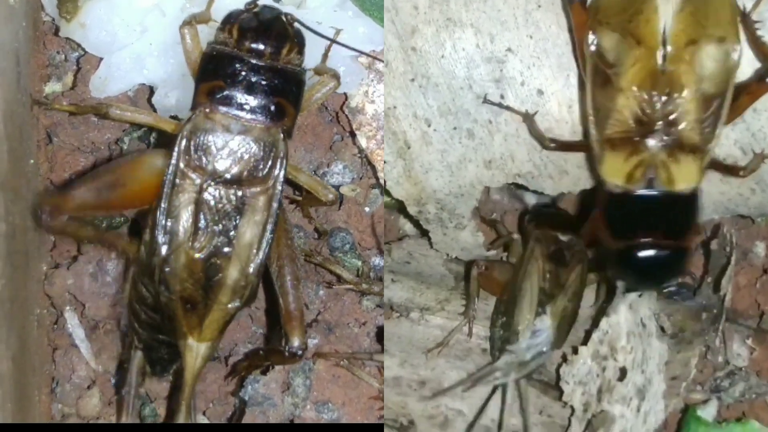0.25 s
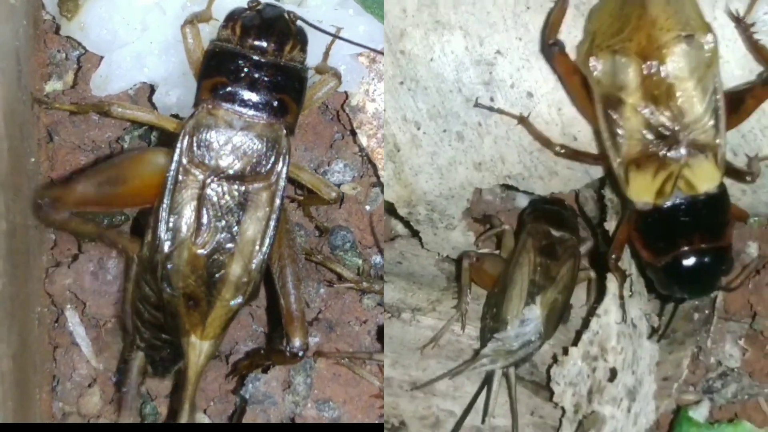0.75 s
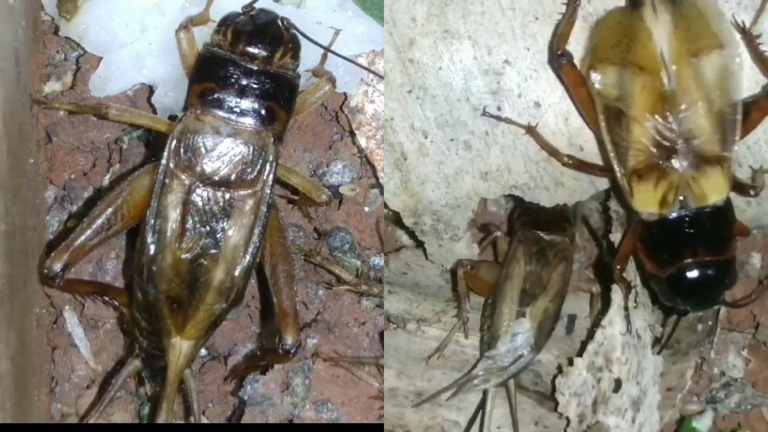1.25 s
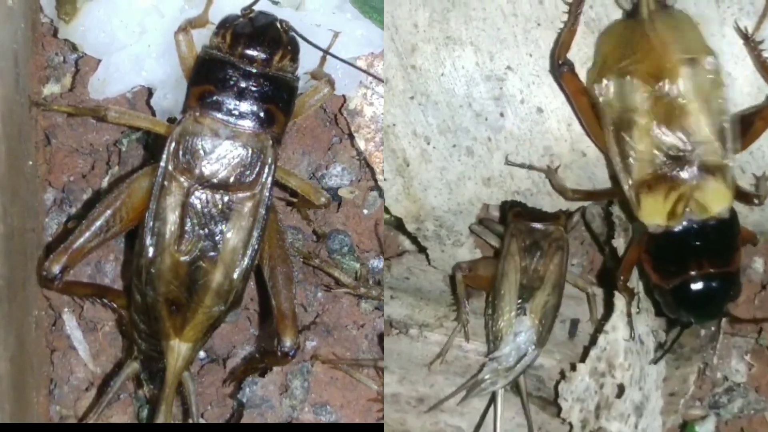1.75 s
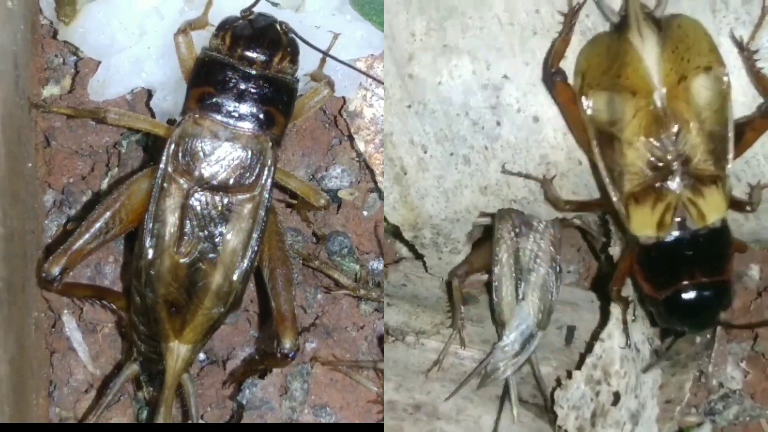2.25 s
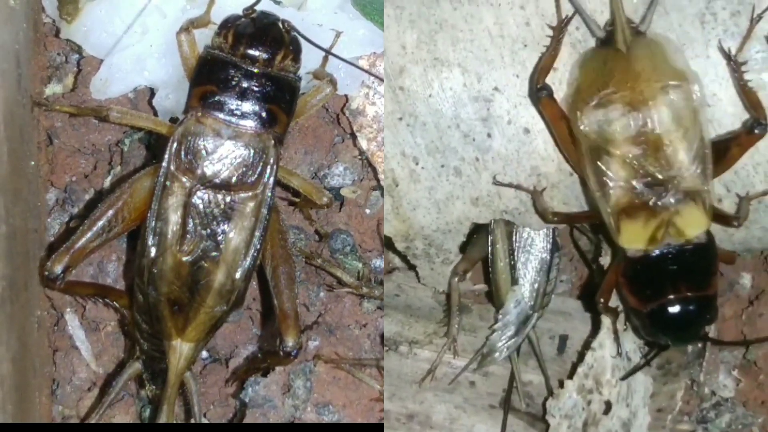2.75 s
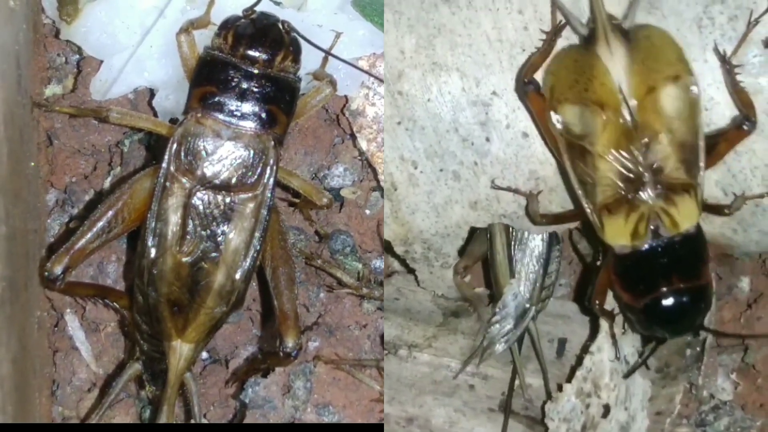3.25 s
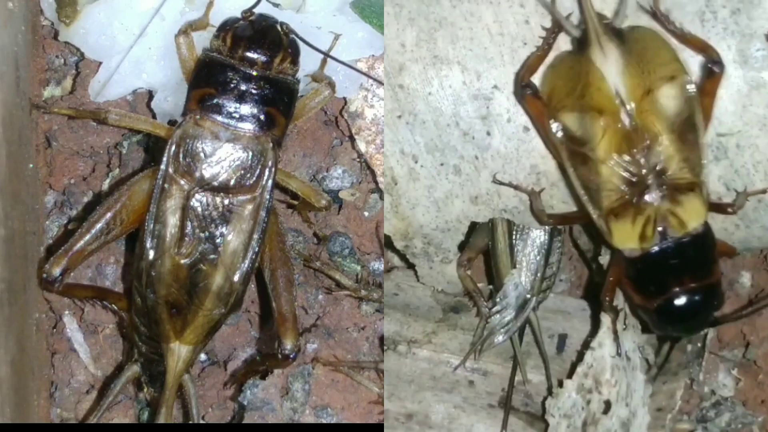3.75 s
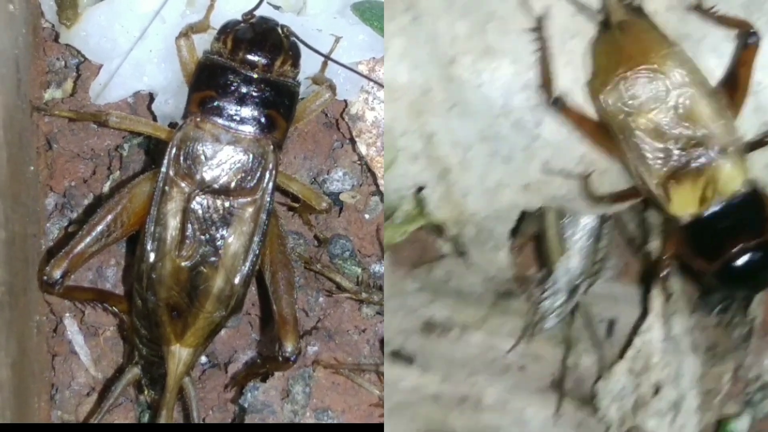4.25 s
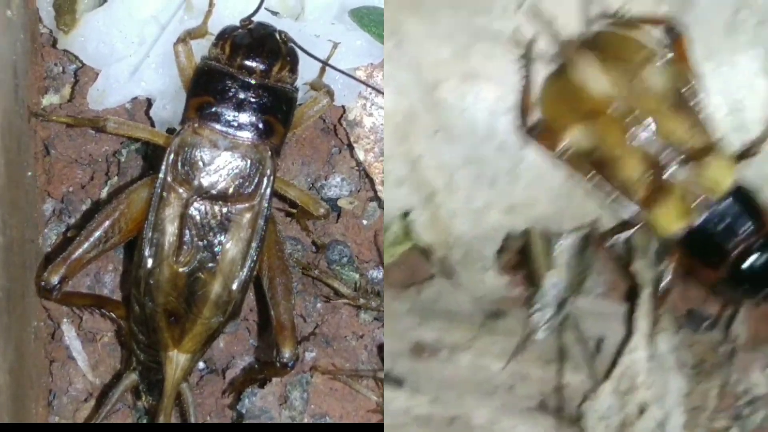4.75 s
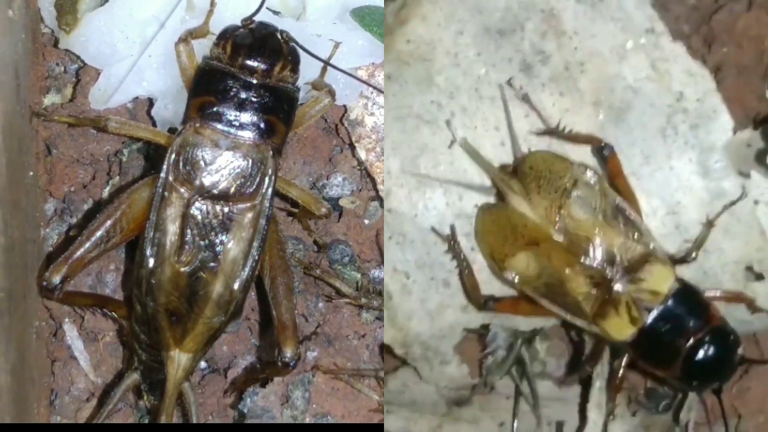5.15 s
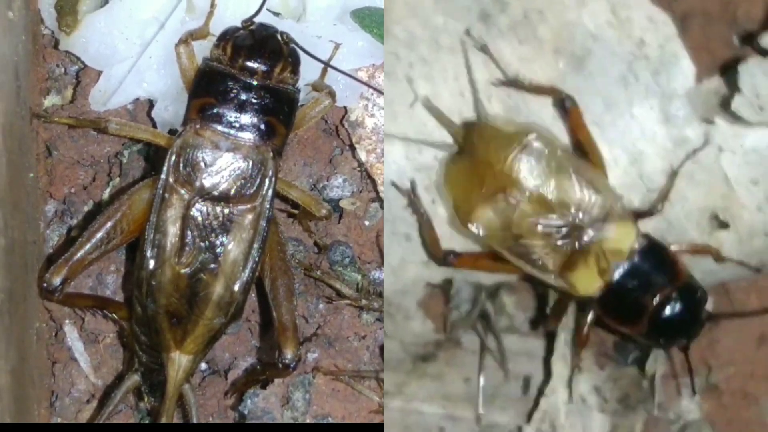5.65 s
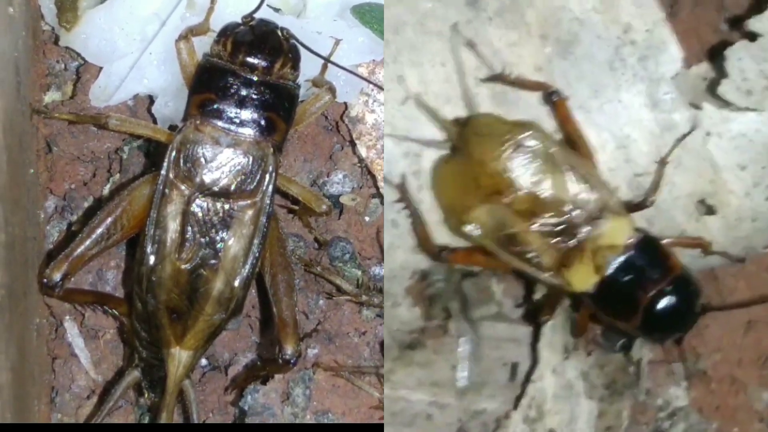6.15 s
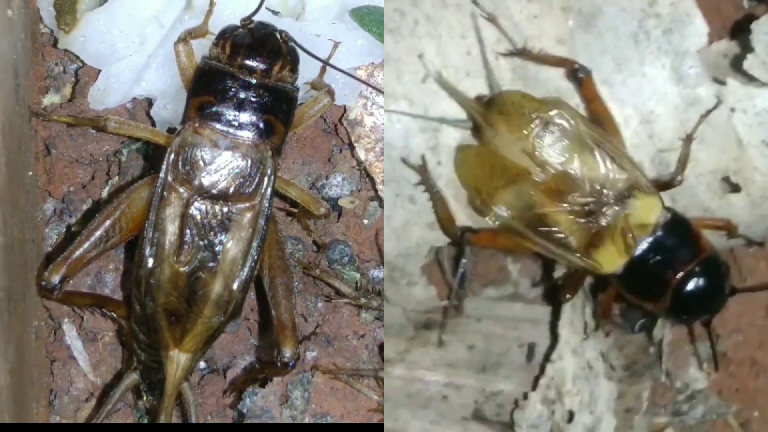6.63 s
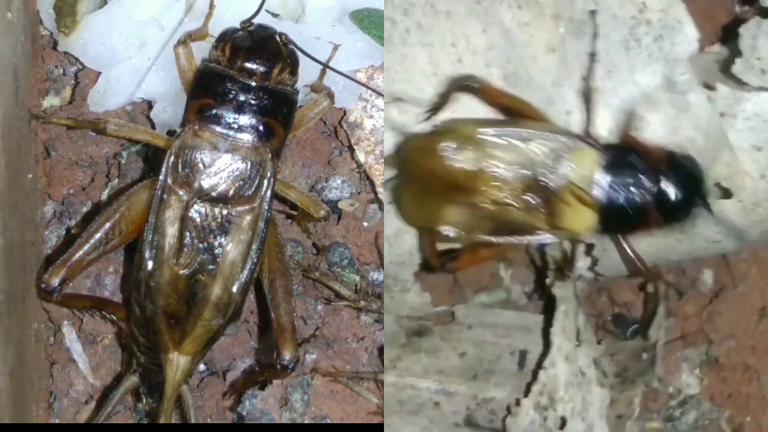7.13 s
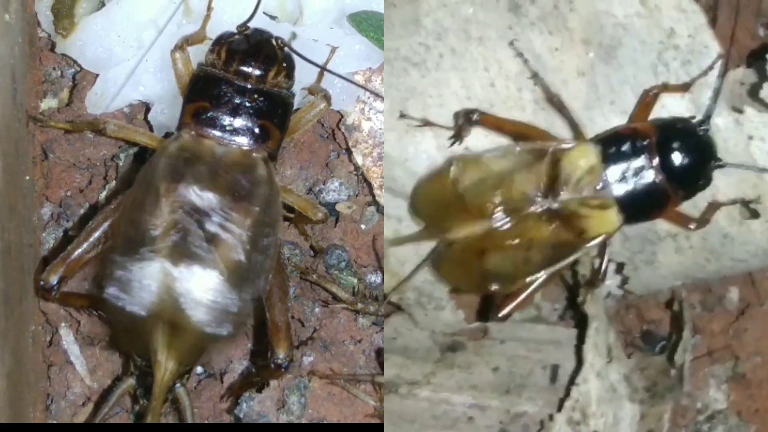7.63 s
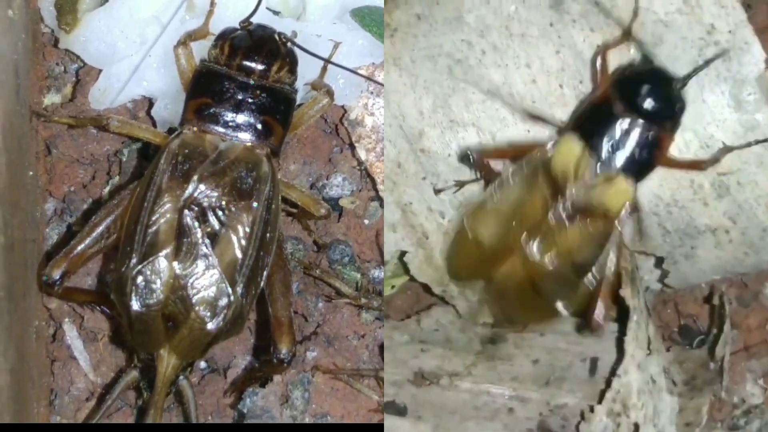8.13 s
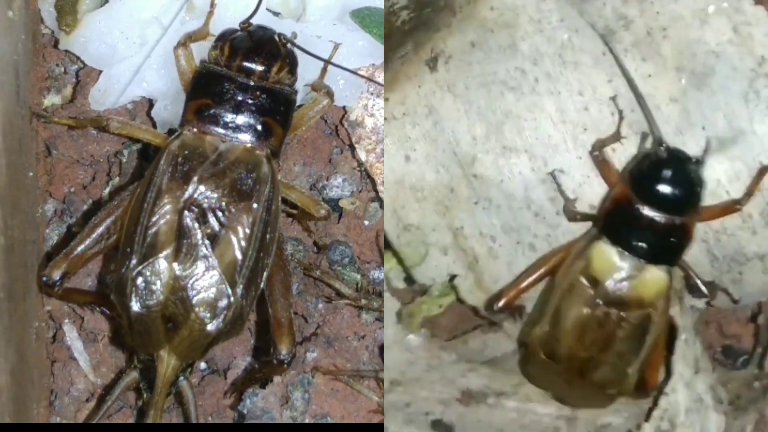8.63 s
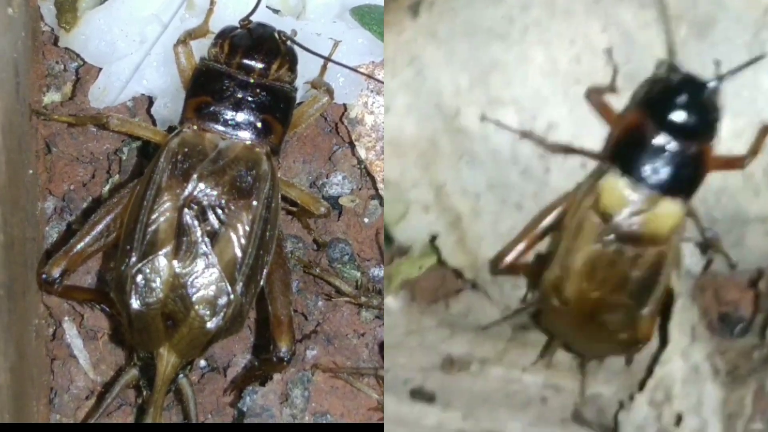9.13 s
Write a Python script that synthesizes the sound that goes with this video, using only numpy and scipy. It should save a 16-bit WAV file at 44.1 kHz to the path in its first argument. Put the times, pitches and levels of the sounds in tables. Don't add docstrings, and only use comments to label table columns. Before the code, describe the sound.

Soft scratchy flicks and very high ticks, stronger on the right, begin about five times a second. Ringing two-part chirps break in briefly, ticks return, then chirps take over at a brisk regular pace. Gentler strokes answer late, leaves rustle faintly, and ticks mix with the last chirps. Close stereo microphone, quiet low hum, short room reverberation.

```python
import sys
import numpy as np
from scipy import signal
from scipy.fft import rfft, irfft, next_fast_len
from scipy.io import wavfile
from scipy.ndimage import uniform_filter1d, minimum_filter1d

SR = 44100
rng = np.random.default_rng(int(sys.argv[2]) if len(sys.argv) > 2 else 0)


def amplitude_ratio(level_db):
    exponent = np.asarray(level_db, float) / 20
    return 10 ** exponent


def generate_wav(signal):
    frames = np.transpose(np.atleast_2d(signal))
    scaled = np.clip(frames, -1, 1) * 32767
    pcm = np.round(scaled).astype(np.int16)
    wavfile.write(sys.argv[1], SR, pcm)


N = 413658

# frequency_hz, density_db
AIR_SPECTRUM = [(22, -53), (45, -1.5), (75, -2.5), (130, -5.5), (220, -13.5), (400, -23), (600, -28),
                (1000, -24.5), (1600, -29.5), (2200, -29.5), (4000, -35.5), (6000, -54.5), (9000, -52),
                (16000, -38)]
AIR_DB = -40
# frequency_hz, likeness_ratio
AIR_COHERENCE = [(60, 0.9), (240, 0.68), (950, 0.0081), (3770, 0.02), (15000, 0.03)]
# frequency_hz, width_hz, level_db
HUM_PARTIALS = [(47.6, 9, -51), (100.5, 9.4, -50), (145, 44, -55), (198, 12.1, -55)]
# start_s, length_s, pitch_hz, level_db
GROANS = [
    (0.024, 0.16, 270, -53.5),
    (3.356, 0.13, 270, -50),
    (6.136, 0.092, 476, -48.5),
    (6.25, .12, 463, -59.5),
]
# time_s, level_db
LEAF_RUSTLE = [
    (8.22, -59),
    (8.3, -51.5),
    (8.39, -47),
    (8.56, -56),
]
# frequency_hz, level_db
LEAF_COLOUR = [(600, -14), (1200, -2), (3000, 0), (6000, -6), (14000, -12)]

# start_s, peak_db, pitch_hz, push_db
TAPS = [
    (.98, -30.5, 940, -42),
    (4.422, -10.5, 1310, -24),
    (6.745, -21.5, 920, -39),
    (6.7673, -9.5, 1350, -23),
]

# frequency_hz, decay_t60_s
ROOM_DECAY = [(5000, 0.43), (12000, 0.36), (15500, 0.24)]
# delay_ms, left_gain_ratio, right_gain_ratio
WALL_ECHOES = [(3.1, .05, .15), (18, .06, .02)]
# frequency_hz, left_db, right_db
WALL_COLOUR = [(4300, -9.5, -12), (5930, -15.5, -25.5), (8130, -16.5, -14.5), (11800, -25, -15),
               (13400, -25.5, -20), (14800, -19, -17.5)]
# frequency_hz, level_db
CAPSULE = [(1, 1), (7000, -1), (8000, -2.5), (8700, 0), (9500, 4), (15300, -4.5), (15700, -12),
           (16100, -13), (17000, -34), (22000, -71)]
# frequency_hz, shift_db
MASK_TILT = [(3000, -4), (3900, 0), (4500, -4), (7000, -2), (8000, 7), (8700, 5), (9400, -5), (13500, -3),
             (16000, 14)]
MASK_DB, MASK_TOP_DB, MASK_FROM_HZ = 24, -76, 3000

# frequency_hz, width_hz, level_db
WING_MODES = [(5190, 650, 8.4), (6410, 1100, 5.5), (7480, 660, -9)]
# frequency_hz, level_db
RASP_COLOUR = [(7500, 9.5), (9000, -1), (10500, -4.5), (12000, 11), (13500, -2), (15000, 6.5), (16000, -41)]
# start_s, peak_db, pitch_hz
FLICKS = [(0.0762, -47, 5500), (0.0916, -41, 5030), (0.1356, -34.5, 6460), (0.2104, -46.5, 5120),
          (0.2254, -40, 6700), (0.2972, -42, 5330), (0.3726, -39, 6600), (0.388, -40.5, 4900),
          (0.4145, -35.5, 6330), (0.4429, -40, 4830), (0.5487, -42, 5250), (0.596, -38.5, 5470),
          (0.6744, -43, 4930), (0.6963, -40, 4960), (0.762, -41, 5220), (1.201, -55, 5250),
          (1.244, -41, 5060), (1.3044, -45.5, 5630), (1.9589, -39, 5600), (1.987, -42, 5330),
          (2.1445, -46, 6700), (2.158, -38.5, 5870), (2.2348, -40, 5400), (2.3695, -41, 5900),
          (2.4339, -44.5, 4850), (2.4464, -42, 5580), (2.5237, -42, 5300), (3.2084, -35.5, 6300),
          (3.2829, -40, 5340), (3.3772, -38.5, 5460), (3.401, -31.5, 5730), (3.4775, -45, 5310),
          (3.4994, -38.5, 5430), (3.581, -44, 5940), (3.6651, -43, 5230), (3.721, -44.5, 5330),
          (3.7499, -48, 5690), (3.7643, -37, 5540), (3.8074, -41, 5760), (3.917, -39.5, 5900),
          (3.9684, -30.5, 6520), (4.047, -38.5, 5380), (4.1076, -37.5, 5800), (4.2393, -42, 5350),
          (4.3101, -39, 5900), (4.3542, -34, 5980), (4.4747, -40.5, 5470), (4.5037, -38, 6700),
          (4.5251, -39.5, 6530), (4.572, -34.5, 5670), (4.6219, -49, 5490), (4.6394, -35.5, 5360),
          (4.718, -39.5, 6440), (4.7461, -37, 5840), (4.7824, -41.5, 5820), (4.8349, -49, 5520),
          (4.921, -35, 5960), (7.477, -46, 4940), (7.4904, -47, 5370), (7.556, -40, 5360)]
FLICK_MS, FLICK_LEFT_DB, FLICK_RIGHT_DB, FLICK_RASP_DB = 3.03, -2, -11, -17
# start_s, pitch_hz, right_db, left_db, wing_ring_left_db
TICKS = [(0.05, 14560, -19.5, -33, -40), (0.268, 15360, -7.5, -22, -33.5), (0.5, 15000, -11.5, -25, -36.5),
         (0.7304, 14830, -11.5, -25, -35), (1.8547, 14600, -12.5, -26, -37),
         (2.0466, 12540, -11.5, -26, -18), (2.257, 14800, -15, -29, -40), (2.4685, 15150, -15.5, -32, -37),
         (3.0715, 13400, -7, -21, -13), (3.252, 14300, -14, -27, -36), (3.445, 15100, -10, -24, -32),
         (3.6255, 15100, -10, -26, -32.5), (3.826, 15500, -9.5, -35, -37), (4.015, 15050, -11, -22, -36),
         (4.2005, 14400, -15, -26, -32.5), (4.398, 14740, -13, -23, -30), (4.593, 14400, -16.5, -26, -30.5),
         (4.8014, 13760, -14.5, -30, -33.5), (7.206, 15300, -8.5, -24.5, -29.5),
         (7.39, 13870, -15.5, -28, -35.5), (7.587, 14560, -13, -26, -30), (8.578, 13160, -9.5, -23, -26),
         (9.239, 14370, -11.5, -31, -31.5)]
TICK_RASP_DB = -29
# start_s, ring_left_db
COCKS = [(0.015, -35), (0.4553, -39.5), (0.648, -44), (1.1116, -37.5), (1.2585, -37), (2.689, -35.5),
         (3.217, -49), (3.4125, -37.5), (3.588, -40.5), (3.776, -42), (3.982, -39.5), (4.156, -45),
         (4.361, -40), (4.5416, -44), (4.765, -42)]
COCK_MS, COCK_RASP_DB = 14.3, -54.5
# start_s, ring_left_db, rasp_right_db
RETURNS = [(0.1034, -45, -47), (0.337, -44.5, -48.5), (0.558, -45, -59), (1.9217, -43, -54),
           (2.097, -42, -48), (2.3143, -49, -53), (3.3056, -39.5, -55), (3.513, -47, -51.5),
           (3.6763, -56, -51), (3.8836, -45, -48), (4.0642, -45, -47), (4.248, -45, -51), (4.448, -42, -47),
           (4.652, -45, -65), (4.854, -38, -55)]
RETURN_MS = 13.5
# ahead_ms, length_ms, ring and rasp relative to the opening stroke_db
LIFT = (16, 7.5, -46, -40.5)
# start_s, length_ms, ring_left_db, rasp_right_db
STRAYS = [(0.0022, 8.4, -39, -54), (1.1, 16, -41.5, -51), (1.213, 5.2, -42, -53), (1.353, 5.5, -57, -62),
          (1.618, 8.8, -38, -51), (1.6393, 15, -34.5, -48), (2.415, 5.2, -50, -62), (2.669, 12, -40, -50),
          (3.5285, 8.5, -41, -55), (3.6928, 10.3, -39, -56), (4.117, 3.4, -43, -57), (4.268, 8.3, -44, -54),
          (4.908, 4.2, -43, -57), (5.075, 6, -41, -51), (5.262, 10, -40, -55), (8.704, 5.2, -49, -56),
          (4.964, 3.4, -41, -60), (7.382, 3.5, -62, -52), (7.5283, 5.1, -30, -46), (7.652, 4, -51, -52),
          (7.764, 5.3, -44, -41), (7.781, 6, -26, -41), (8.1795, 5.7, -35, -47), (8.282, 4.6, -39, -52),
          (8.3, 5.7, -41.5, -51), (8.35, 4.9, -38, -52), (8.33, 8, -45, -51), (8.368, 9.4, -33.5, -44),
          (8.3915, 5.3, -29.5, -44), (8.407, 4, -33, -40), (8.52, 3.7, -57, -52), (8.5616, 5.7, -45.5, -40),
          (8.871, 6, -39, -47), (9.0323, 7.7, -40, -52), (9.188, 8, -38.5, -52), (9.21, 5, -49, -56),
          (9.33, 8.9, -37, -49)]

# start_s, length_ms, pitch_hz, left_db, rise_ms
SLOW_STROKES = [
    (7.5811, 19.6, 5410, -22, 1.1),
    (7.626, 35, 5730, -19, 14),
    (7.691, 31.6, 5776, -19.5, 7.7),
    (7.748, 27.4, 5530, -21.5, 18),
]
SLOW_RIGHT_DB, SLOW_SECOND_DB, SLOW_RASP_DB = -3.5, -18.5, -44
# pitch_hz, left_db, right_db, second_harmonic_db
SLOW_BEAM = [(5050, -6, -5, -4), (5250, -3, -6, 0), (5450, -1, -8, -3), (5600, 0, -1, -12), (5800, -1, 0, -6)]
# pitch_hz, left_db, right_db, second_harmonic_db
BEAM = [(5250, -30, -18, -16), (5390, -14, -12, -11), (5480, -5, -9, -7), (5610, -.5, -4, -4),
        (5720, -.5, -1, -6), (5830, -6, 0, -1), (5960, -16, -3, 0), (6200, -23, -10, -6)]
# pitch_hz, left_db, right_db, second_harmonic_db
TURNED_BEAM = [(5350, -22, -18, -22), (5480, -6, -12, -11), (5610, 0, -9, -3), (5710, -1, -3, -1),
               (5810, -9, 0, 0), (5900, -22, -1, -2), (6020, -19, -4, -7), (6200, -15, -8, -18)]
TURN_S = 8.1
# start_s, opening_pitch_hz, opening_left_db, closing_gap_ms (5 or less for none), closing_left_db
CHIRPS = [(1.4221, 5850, -15, 26, -5), (1.6681, 5890, -11, 4.5, -2), (2.7125, 6200, -6.5, 0, 0),
          (2.867, 5780, -11.5, 24.5, -4.5), (4.9916, 5890, -11, 24.5, -4.5), (5.1699, 5950, -5.5, 27, -2.5),
          (5.367, 6090, -3.5, 27, -1.5), (5.5676, 6140, -3.5, 28, -1), (5.7614, 6010, -3.5, 26, -1),
          (6.041, 5986, -4, 26, -2), (6.2084, 5890, -5, 23, -2), (6.3959, 6110, -2.5, 27.5, -1.5),
          (6.5917, 6030, -4.5, 24.5, -1), (6.8012, 6130, -3.5, 25.5, -1), (6.9737, 5880, -7, 21.5, -1),
          (7.023, 6130, -3.5, 0, 0), (7.8002, 6140, -7, 24.5, -4), (7.9765, 5900, -5.5, 23.5, -3),
          (8.187, 5860, -6, -3.5, -2), (8.4153, 5930, -8.5, 0, 0), (8.7197, 5720, -2.5, 19.5, -1.5),
          (8.8876, 5870, -4, 23.5, -2), (9.0503, 5950, -8.5, 20.5, -3.5)]
CLOSING_HZ, CLOSING_SECOND_DB = 6220, -3.5
END_HZ, TURNED_END_HZ, SINK_HZ_PER_MS = 5200, 5320, 58
# time_s, right_minus_left_db, second_harmonic_minus_left_db
FACING = [(1.4, -5.5, -8.5), (2.8, -5, -10.5), (5, -9, -15), (5.5, -15.5, -18.5), (7.05, -14, -15.5),
          (7.8, -12, -14.5), (8.0, -9.5, -14.5), (8.19, -7, -10.5), (8.42, -1.5, -10), (8.72, -14, -9),
          (8.9, -8, -9.5), (9.06, -5.5, -8.5)]
# frequency_hz, level_db
CATCH_COLOUR = [(5500, 29.0), (6700, 23.0), (8000, 11), (10000, 8.0), (13500, 14.0), (14600, 12), (16200, -30)]
RIGHT_LEAD, LEFT_SECOND_LEAD = 0.33, 2.1
LEFT_LAG = 17


def evened(x):
    return x / np.sqrt(np.mean(x ** 2) + 1e-20)


def read(points, hz):
    f, value = np.transpose(points)
    return np.interp(np.log(hz + 1), np.log(f + 1), value)


def add(mix, s, sound):
    part = mix[:, round(s * SR):][:, :sound.shape[1]]
    part += sound[:, :part.shape[1]]


def coloured(x, points):
    size = next_fast_len(x.shape[-1])
    hz = np.fft.rfftfreq(size, 1 / SR)
    inside = (hz > points[0][0]) & (hz < points[-1][0])
    return irfft(rfft(x, size) * amplitude_ratio(read(points, hz)) * inside, size)[..., :x.shape[-1]]


def whistle(hz, width):
    r = np.exp(-np.pi * width / SR)
    z = rng.standard_normal(N) + 1j * rng.standard_normal(N)
    slow = signal.lfilter([1], [1, -2 * r, r * r], z)
    return evened((slow * np.exp(2j * np.pi * hz * np.arange(N) / SR)).real)


def wobble(size, ms):
    span = int(ms * SR / 1000) + 1
    return evened(uniform_filter1d(uniform_filter1d(rng.standard_normal(size), span), span))


def gritty(points, grain_db):
    slips = rng.standard_normal(N) * amplitude_ratio(grain_db * wobble(N, 0.29))
    other = rng.standard_normal(N) * amplitude_ratio(grain_db * wobble(N, 0.17))
    return evened(coloured(slips, points)), evened(coloured(other, points))


def background():
    frames, hz, t = N // 256 + 5, np.fft.rfftfreq(1024, 1 / SR), np.arange(N) / SR
    a, b, c, d, patches = rng.standard_normal((frames, 513, 5)).T
    patches = evened(uniform_filter1d(uniform_filter1d(patches, 12, 0), 14, 1))
    same = np.clip(read(AIR_COHERENCE, hz), -1, 1)[:, None]
    left = a + 1j * b
    right = same * left + np.sqrt(1 - same ** 2) * (c + 1j * d)
    z = np.array([left, right]) * amplitude_ratio(1.93 * patches)
    air = signal.istft(z, nperseg=1024, noverlap=768)[1][:, :N]
    out = amplitude_ratio(AIR_DB - 4) * evened(coloured(air, AIR_SPECTRUM))
    hum = sum(amplitude_ratio(db) * whistle(f, width) for f, width, db in HUM_PARTIALS)
    out += hum * amplitude_ratio([[-1.5], [1.5]])
    for s, length, f, db in GROANS:
        out += amplitude_ratio(db) * whistle(f, 67) * np.exp(-((t - s - length / 2) / (length / 2)) ** 4)
    leaves = np.array(gritty(LEAF_COLOUR, 5.0)) * amplitude_ratio(4 * wobble(N, 2) - 1)
    return out + leaves * amplitude_ratio(np.interp(t, *np.transpose(LEAF_RUSTLE)))


def room(x):
    taps = np.zeros((2, SR // 2))
    at = np.arange(200, SR // 2 - 20, 20) + rng.integers(0, 20, (2, (SR // 2 - 201) // 20))
    np.put_along_axis(taps, at, rng.choice([-1., 1.], at.shape), 1)
    hz, t, z = signal.stft(taps, SR, nperseg=256)
    tail = signal.istft(z * amplitude_ratio(-60 * t / read(ROOM_DECAY, hz)[:, None]), SR, nperseg=256)[1]
    tail /= np.linalg.norm(tail[0])
    wet = signal.fftconvolve(x[2:], tail, axes=1)[:, :N]
    f, *sides = np.transpose(WALL_COLOUR)
    out = np.array([coloured(w, [(1, -23)] + list(zip(f, db)) + [(22000, -28)]) for w, db in zip(wet, sides)])
    for ms, left, right in WALL_ECHOES:
        out += np.roll(x[:2], int(ms * SR / 1000), axis=1) * [[left], [right]]
    return out


def taps():
    out, t = np.zeros((2, N)), np.arange(-120, 500) / SR
    for s, db, hz, push_db in TAPS:
        snap = amplitude_ratio(db) * np.exp(-(abs(t) * hz / 0.58) ** 2.7) * np.sin(-2 * np.pi * hz * t)
        later = np.maximum(t - .001, 0)
        push = amplitude_ratio(push_db) * 2.0 * np.sin(2 * np.pi * 170 * later) * np.exp(-later / 0.0025)
        add(out, s + t[0], np.array([snap + push, 0 * t]))
    return out


def wing_ring(wander_db, wander_ms):
    modes = (amplitude_ratio(db + wander_db * wobble(N, wander_ms)) * whistle(hz, width) for hz, width, db in WING_MODES)
    return evened(sum(modes) * amplitude_ratio(1.4 * wobble(N, 0.12)))


def flicks():
    out, rasp = np.zeros((3, N)), np.zeros((1, N))
    t = np.arange(500) / SR * 1000
    shape = t / FLICK_MS * np.exp(1 - t / FLICK_MS) * np.clip((t[-1] - t) / 2, 0, 1)
    for s, db, hz in FLICKS:
        note = np.sin(2 * np.pi * np.cumsum(hz + 330 * wobble(500, 0.18)) / SR)
        note = note * amplitude_ratio(np.minimum(3.15 * wobble(500, 0.33), 4))
        levels_db = db + np.array([[FLICK_LEFT_DB], [FLICK_RIGHT_DB], [-3.0]])
        add(out, s - .0025, amplitude_ratio(levels_db) * shape * note)
        add(rasp, s - .0025, amplitude_ratio(db + FLICK_RASP_DB) * shape[None])
    return out, rasp


def ticks():
    out, rasp = np.zeros((3, N)), np.zeros((1, N))
    t = np.arange(600) / SR * 1000
    shape = (t / 2.84) ** 3 * np.exp(3 - 3 * t / 3.624)
    for s, hz, right_db, left_db, ring_db in TICKS:
        pitch = hz * 1.03 - 70 * (t - 3) + 300 * wobble(600, 0.2)
        stray = hz * .95 + 900 * wobble(600, .2)
        wing = 6400 - 110 * (t - 3) + 190 * wobble(600, 0.3)
        high, side, low = np.sin(2 * np.pi * np.cumsum([pitch, stray, wing], axis=1) / SR)
        side_beats = 2 * np.array([wobble(600, .4), 0 * t, wobble(600, .4)])
        beats = amplitude_ratio(np.clip(5 * wobble(600, .3) + side_beats, -18, 6))
        whistled = high + amplitude_ratio(-8.0) * side
        add(out, s, amplitude_ratio([[left_db], [right_db], [right_db]]) * 0.42 * shape * beats * whistled)
        add(out, s, amplitude_ratio(ring_db + np.array([[-1.5], [-9], [-2.5]])) * shape * np.sqrt(beats) * low)
        add(rasp, s, amplitude_ratio(right_db + TICK_RASP_DB) * shape[None])
    return out, rasp


def scrapes():
    ahead, lift_ms, lift_ring_db, lift_rasp_db = LIFT
    rows = [(s, COCK_MS, db, COCK_RASP_DB) for s, db in COCKS]
    rows += [(s, RETURN_MS, *db) for s, *db in RETURNS]
    rows += [(s - ahead / 1000, lift_ms, db + lift_ring_db, db + lift_rasp_db)
             for s, _, db, gap, _ in CHIRPS if gap > 5 and s < TURN_S]
    return [*rows, *STRAYS]


def wings():
    out, rasp = (a + b for a, b in zip(ticks(), flicks()))
    ring, busy = np.zeros((2, 1, N))
    for s, ms, ring_db, rasp_db in scrapes():
        shape = signal.windows.tukey(int((ms + 2) * SR / 1000), .8)[None]
        add(ring, s - .001, amplitude_ratio(ring_db + 3.5) * shape)
        add(rasp, s - .001, amplitude_ratio(rasp_db + 6.0) * shape)
        add(busy, max(s - .07, 0), np.hanning(6600)[None])
    brush = np.minimum(busy, 1) * amplitude_ratio(-56 + 5.5 * np.minimum(wobble(N, .8), 2.2))
    ring, rasp = ring + brush, rasp + amplitude_ratio(-28.0) * brush
    ring_l, ring_r = wing_ring(2.5, 2.5), wing_ring(2.5, 2.5)
    rasp_l, rasp_r = gritty(RASP_COLOUR, 3)
    out[0] += ring[0] * ring_l + amplitude_ratio(-11.0) * rasp[0] * (0.384 * rasp_r + 2.04 * rasp_l)
    out[1] += amplitude_ratio(-8) * ring[0] * (0.39 * ring_l + 0.8 * ring_r) + rasp[0] * rasp_r
    out[2] += amplitude_ratio(-6.0) * ring[0] * ring_l + amplitude_ratio(1.0) * rasp[0] * rasp_r
    return out


def strokes():
    rows = [(s, hz, db, 0) for s, hz, db, _, _ in CHIRPS]
    rows += [(s + gap / 1000, CLOSING_HZ, db, CLOSING_SECOND_DB) for s, _, _, gap, db in CHIRPS if gap > 5]
    at, right_db, second_db = np.transpose(FACING)
    out = []
    for s, hz, db, purer in rows:
        end_hz = END_HZ if s < TURN_S else TURNED_END_HZ
        ms = (hz - end_hz) / SINK_HZ_PER_MS
        out.append((s, ms, hz, db, db + np.interp(s, at, right_db), db + purer + np.interp(s, at, second_db)))
    return out


def stroke(row, beam, fall_hz_ms, bend, rise_ms, left_second_db=-13, hook_hz=400, flutter_db=1.11,
           second_lead=LEFT_SECOND_LEAD):
    s, ms, hz, left_db, right_db, second_db = row
    t = np.arange(int(ms * SR / 1000)) / SR * 1000
    cycle = np.arange(len(t)) % 600
    glide = fall_hz_ms * t * ((1 - bend) + bend * 2 * (t / ms) ** 2 - bend * .5)
    hook = hook_hz * np.exp(-t / .7)
    pitch = hz - glide + 15 * wobble(600, 0.15)[cycle]
    turn = 2 * np.pi * (np.cumsum(pitch + hook) / SR + rng.random())
    edge = np.clip(t / rise_ms, 0, 1) * np.clip((ms - t) / 3, 0, 1)
    f, *gains = np.transpose(sorted(beam))
    left, right, second = (edge * amplitude_ratio(uniform_filter1d(np.interp(pitch, f, g), size=60)) for g in gains)
    left, right, second = left / left.max(), right / right.max(), second / second.max()
    flutter = amplitude_ratio(flutter_db * wobble(600, .8)[cycle])
    low = np.sin(turn)
    upper = amplitude_ratio(second_db) * flutter ** 2 * np.sin(2 * turn)
    left_upper = amplitude_ratio(left_second_db + second_db) * flutter ** 4 * np.sin(2 * turn + second_lead)
    heard_left = left * (amplitude_ratio(left_db) * low + left_upper)
    heard_right = amplitude_ratio(right_db) * right * flutter * np.sin(turn + RIGHT_LEAD) + second * upper
    tuned = np.exp(-((pitch - 5770) / 340) ** 2)
    upper_tuned = np.exp(-((pitch - 5860) / 450) ** 2)
    spread = edge * tuned * (amplitude_ratio(left_db - 3.5) * low + upper_tuned * upper)
    return s, np.sqrt(2) * np.array([heard_left, heard_right, spread])


def chirps():
    out, catch = np.zeros((3, N)), np.zeros((1, N))
    for row in strokes():
        add(out, *stroke(row, BEAM if row[0] < TURN_S else TURNED_BEAM, 60.3, 0.21, 0.72))
        t = np.arange(int(row[1] * SR / 1000)) / SR
        puff = (1 - np.exp(-t / .0015)) * (np.exp(-t / .003) + .2)
        add(catch, row[0] - .002, amplitude_ratio(row[5] - 1.5) * puff[None])
    for s, ms, hz, db, rise_ms in SLOW_STROKES:
        row = (s, ms, hz, db, db + SLOW_RIGHT_DB, db + SLOW_SECOND_DB)
        add(out, *stroke(row, SLOW_BEAM, 15.5, 0.8, rise_ms, left_second_db=-3, hook_hz=0,
                         flutter_db=.9, second_lead=0))
        add(catch, s, amplitude_ratio(db + SLOW_RASP_DB) * signal.windows.tukey(int(ms * SR / 1000), .5)[None])
    a, b = gritty(CATCH_COLOUR, 3)
    return out + catch * np.array([amplitude_ratio(-8) * a, b, b])


def scene():
    insects = chirps() + wings()
    insects[0] = np.roll(insects[0], LEFT_LAG)
    return insects[:2] + room(insects) + taps() + background()


def masked(x):
    hz, _, z = signal.stft(x, SR, nperseg=1024)
    level_db = 10 * np.log10(uniform_filter1d(abs(z) ** 2, size=11, axis=1) + 1e-14)
    treble = (hz > MASK_FROM_HZ)[:, None]
    loudest_db = -minimum_filter1d(-np.where(treble, level_db, -140), size=131, axis=1)
    ragged_db = np.repeat(1.8 * rng.standard_normal((47, z.shape[2])), 11, axis=0)[:len(hz)]
    threshold_db = np.minimum(loudest_db - MASK_DB, MASK_TOP_DB)
    over_db = level_db + ragged_db - read(MASK_TILT, hz)[:, None] - threshold_db
    gain = np.where(treble, np.clip(over_db / 2, .02, 1), 1)
    return signal.istft(z * gain, SR, nperseg=1024)[1][:, :N]


def roll_off(x):
    return signal.sosfilt(signal.butter(12, 16480, fs=SR, output="sos"), x)


def record(dry):
    heard = coloured(dry, CAPSULE)
    r = np.exp(-1 / (.25 * SR))
    power_db = 10 * np.log10(signal.lfilter([1 - r], [1, -r], (heard ** 2).mean(0)) + 1e-9)
    ducked = heard / amplitude_ratio(0.097 * np.maximum(power_db + 34, 0))
    mix = masked(np.clip(ducked * amplitude_ratio(1.5), -1, 1))
    return roll_off(mix)


dry = scene()
out = record(dry)
generate_wav(out)
```